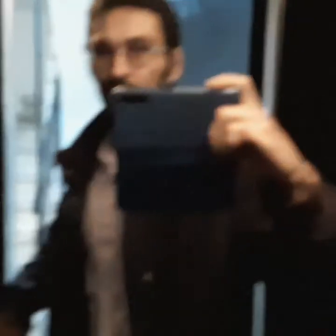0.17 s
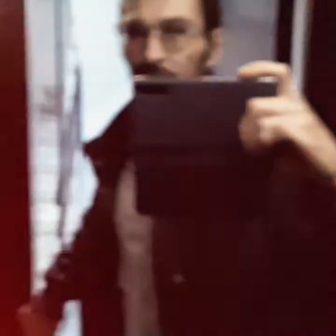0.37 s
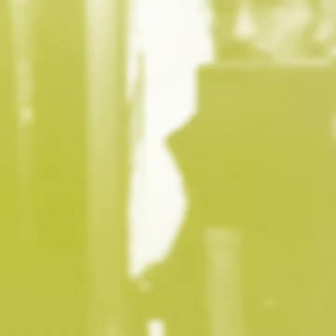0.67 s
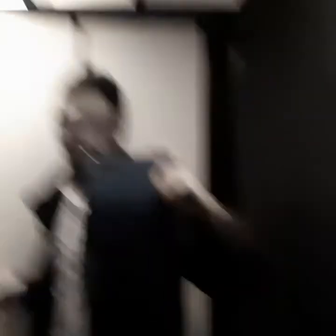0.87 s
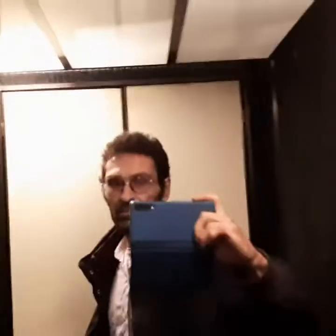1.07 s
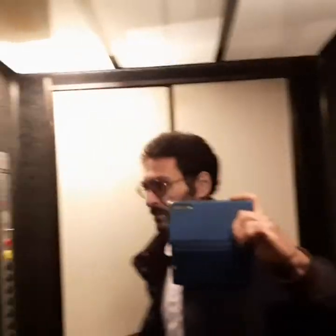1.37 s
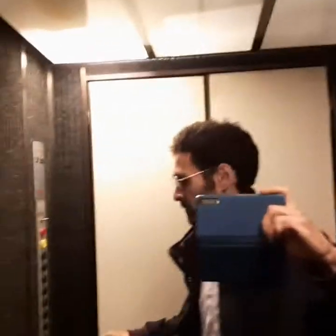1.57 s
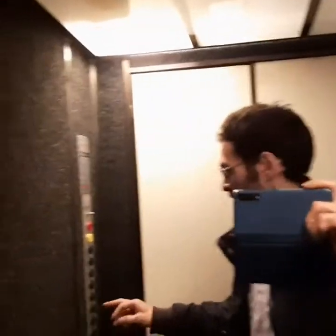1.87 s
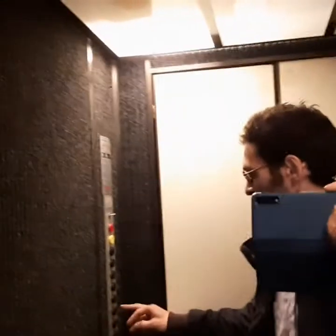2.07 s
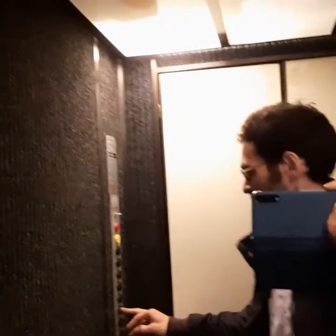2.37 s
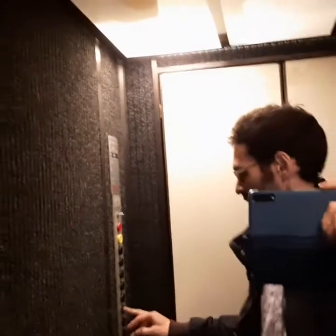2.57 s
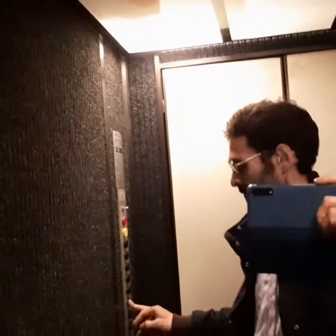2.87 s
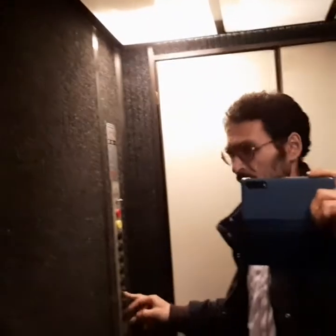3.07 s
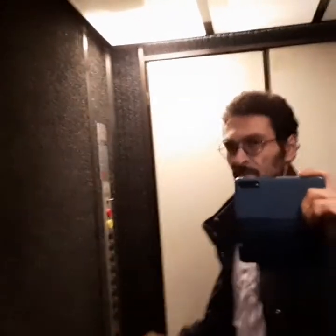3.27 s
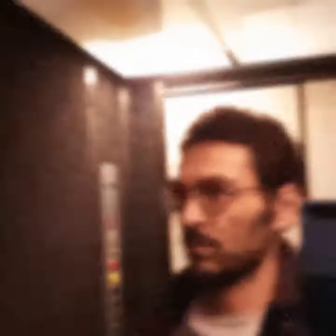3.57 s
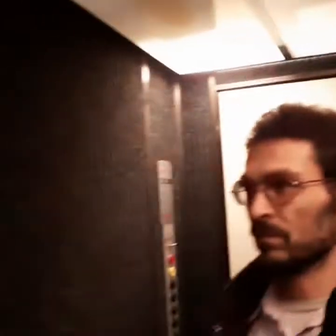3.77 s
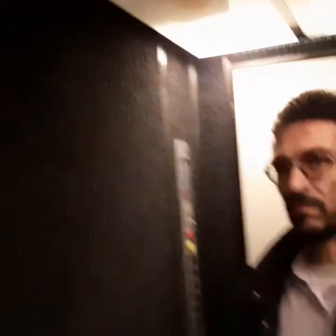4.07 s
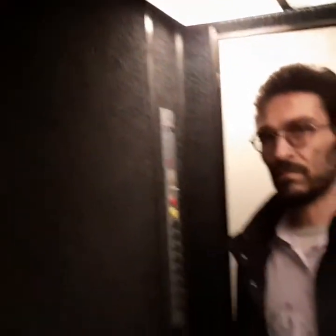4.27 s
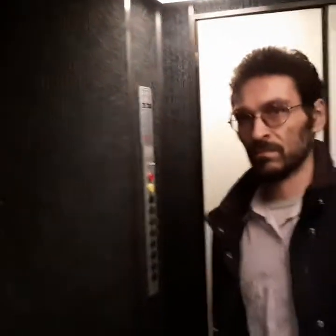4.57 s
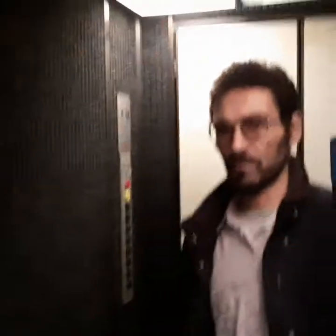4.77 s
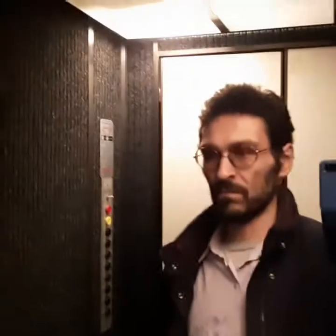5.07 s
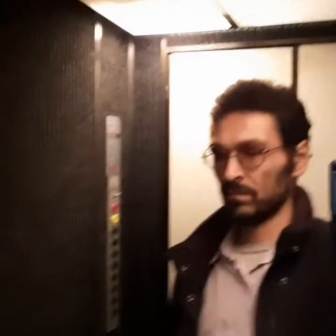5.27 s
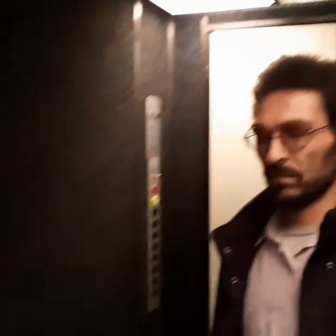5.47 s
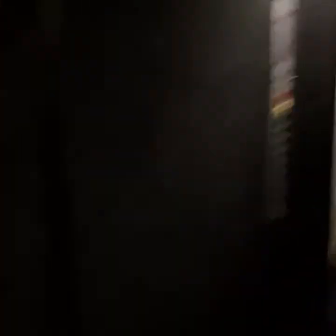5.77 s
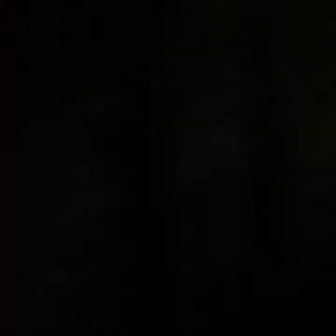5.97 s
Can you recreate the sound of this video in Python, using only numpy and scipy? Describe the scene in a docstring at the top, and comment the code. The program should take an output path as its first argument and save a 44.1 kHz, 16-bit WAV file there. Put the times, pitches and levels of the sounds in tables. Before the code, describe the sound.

Close to the microphone, a nylon sleeve swishes and gives a tiny zip over soft floor bumps. Lift doors crash shut, loud enough to distort, and rebound dully. Quiet cloth and ticks follow, then a button clunk, a clattering metal lock and a groaning motor start. The small car hums and rattles; a longer nylon zip, bumps and one hollow knock come before the hum eases off.

```python
"""A nylon sleeve swishes and zips close to the microphone, over soft bumps and the quiet air of a small lift car.
The doors slam into overload, a button is pressed, the lock clatters home and the motor starts to hum;
one more knock comes on the way. Cloth, air and rumble are coloured noise; blows are noise bursts and
decaying modes; a zip adds multiples of the rib rate to a rub; the hum is a set of wavering tones.
Two microphone ports hear it all, alike in the bass and less so in the treble."""
import sys
import numpy as np
from scipy import signal
from scipy.fft import rfft, irfft, next_fast_len
from scipy.io import wavfile

SR = 44100
rng = np.random.default_rng(int(sys.argv[2]) if len(sys.argv) > 2 else 0)


def inscribe(sig):
    """Save sig as 16-bit PCM at rate SR to the path in sys.argv[1].

    A 1-D sig is mono; a 2-D sig holds one channel per row.
    Samples are clipped to [-1, 1] before scaling.
    """
    pcm = np.round(np.clip(np.atleast_2d(sig).T, -1, 1) * 32767)
    wavfile.write(sys.argv[1], SR, pcm.astype(np.int16))


N = 270333
TIME = np.arange(N) / SR  # s

# how much louder the left port hears than the right: [f/Hz, level/dB]
BALANCE = [(60, -1.5), (300, -2.5), (700, -2), (1300, -1.5), (2400, -4.5), (4300, -4.5), (8000, -7.5),
           (14000, -8.5)]
# noise colour of a wall struck or shaken: [f/Hz, level/dB]
WALL_COLOUR = [(100, -24), (240, -3.5), (380, 1.5), (560, -1), (760, -6.5), (1400, -13.5), (2500, -15),
               (5000, -22.5), (15000, -53)]


def amp(db):
    """Decibels to gain."""
    return 10 ** (np.asarray(db) / 20)


def unit(x):
    """Scales to rms 1."""
    return x / np.sqrt(np.mean(x ** 2) + 1e-20)


def read(points, hz):
    """Reads a curve of (frequency, value) points on a log-frequency axis."""
    f, value = np.transpose(points)
    return np.interp(np.log(hz + 1), np.log(f), value)


def add(mix, s, sound):
    """Mixes a stereo sound in at s seconds."""
    part = mix[:, round(s * SR):][:, :sound.shape[1]]
    part += sound[:, :part.shape[1]]


def wander(rate_hz, size=N):
    """Slow chance: noise that falls away above rate_hz, at rms 1 before it is cut to size."""
    span = next_fast_len(max(size, SR))
    hz = np.fft.rfftfreq(span, 1 / SR)
    spectrum = rfft(rng.standard_normal(span)) / (1 + (hz / rate_hz) ** 4)
    return unit(irfft(spectrum, span))[:size]


def noise(colour, size=N):
    """Coloured noise at two microphone ports: alike in the bass, stronger on the right in the treble."""
    # likeness of the two ports: [f/Hz, correlation]
    likeness = [(60, 1), (300, 0.75), (630, 0.68), (1300, 0), (15000, 0.12)]
    hz = np.fft.rfftfreq(size, 1 / SR)
    a, b = np.exp(2j * np.pi * rng.random((2, len(hz))))
    same = np.clip(read(likeness, hz), -1, 1)
    lean_db = read(BALANCE, hz) / 2
    left = a * amp(lean_db)
    right = (same * a + np.sqrt(1 - same ** 2) * b) * amp(-lean_db)
    return unit(irfft(np.array([left, right]) * amp(colour(hz)), size))


def floor():
    """The quiet air of the car, a steady coloured noise."""
    # spectrum of the air: [f/Hz, level/dB]
    air_colour = [(12, -47), (20, -14.5), (92, 11.5), (189, -15.5), (1140, -17), (1310, -20.5),
                  (3090, -24.5), (4080, -15), (6910, -17.5), (9110, -29.5), (15000, -25)]
    return amp(-59.5) * noise(lambda hz: read(air_colour, hz))


def sleeve():
    """Grainy hiss of nylon that swells and fades with each move of the arm."""
    # moves of the arm: [t/s of the peak, level/dB, swell/s, fade/s]
    swishes = [(.16, -42.5, 0.31, 0.33), (.19, -41, 0.05, .03), (1.078, -47, 0.41, 0.43),
               (2.10, -61, 0.16, 0.32), (3.481, -40.5, 0.41, 0.17), (4.401, -44.5, 0.48, 0.47),
               (5.14, -58, 0.43, 0.083), (5.969, -51, 0.078, 0.18)]
    # spectrum of the cloth: [f/Hz, level/dB]
    cloth_colour = [(100, -4), (350, 7), (900, -6), (1500, -3.5), (2050, 1.5), (2700, -7.5), (3600, -2.5),
                    (4300, 3.5), (5700, -7), (7300, 3), (8600, -15), (11500, -11.5), (15000, -20.5)]
    drop_db, roundness = 11, 1.61  # drop over one swell or fade; 1 = pointed, 2 = bell
    power = 0
    for s, db, swell, fade in swishes:
        away = np.maximum((s - TIME) / swell, (TIME - s) / fade)
        power = power + amp(db - drop_db * away ** roundness) ** 2
    grain = amp(1.4 * wander(90))
    return noise(lambda hz: read(cloth_colour, hz)) * np.sqrt(power) * grain


def burst(colour, rise, t60):
    """A blow scattered by the close walls: dense ringing that swells and dies."""
    t = TIME[:SR]
    return noise(colour, size=SR) * (1 - np.exp(-t / rise)) * amp(-60 * t / t60)


def ring(modes, rise):
    """Modes after one blow; the higher ones reach the two ports further out of phase."""
    t, out = TIME[:SR], 0
    for hz, db, t60 in modes:
        lag = np.array([[0], [1]]) * rng.choice([-1, 1]) * hz / 700  # radians
        lean_db = read(BALANCE, hz) * np.array([[.5], [-.5]])
        wave = np.sin(2 * np.pi * (hz * t + rng.random()) + lag)
        out = out + amp(db + lean_db) * amp(-60 * t / t60) * wave
    return out * (1 - np.exp(-t / rise))


def panels(rise):
    """The walls' drumming modes, with the quicker-rising modes of the door skin."""
    # modes of the car's panels: [f/Hz, level/dB, t60/s]
    panel_modes = [(78.3, -25, 1), (115.5, -20.5, 0.7), (140.55, -5.5, .4), (202, -27.5, 0.59),
                   (280, 2.5, 0.18), (341, -31, 0.91), (411, -0.5, 0.18), (446.3, -1, 0.11),
                   (519, -12.5, 0.26), (617, -21, 0.16), (685, -7, 0.12), (779, -13, 0.2), (849, -9, 0.17),
                   (870, -7, 0.17), (1136, -11, 0.16)]
    # modes of the doors' sheet steel: [f/Hz, level/dB, t60/s]
    skin_modes = [(935, -22, 0.079), (1248, -15.5, 0.13), (1442, -17, 0.06), (1810, -21, 0.086),
                  (2330, -16, 0.13), (2557, -13, 0.14)]
    return ring(panel_modes, rise) + ring(skin_modes, rise / 2)


def thump(rise, t60):
    """The floor's dull answer to a blow."""
    # spectrum of the struck floor: [f/Hz, level/dB]
    floor_colour = [(25, -24), (45, -7), (70, 7.5), (130, 4.5), (220, -16), (400, -19), (1000, -65)]
    return burst(lambda hz: read(floor_colour, hz), rise, t60)


def clack(rise, t60):
    """A wall's answer: a woody clack and its panel modes."""
    return burst(lambda hz: read(WALL_COLOUR, hz), rise, t60) + amp(-10) * panels(rise)


def bumps():
    """Soft bumps of feet and car thump the floor and barely stir the walls."""
    # bumps on the car floor: [t/s, level/dB]
    bump_times = [(0.174, -41), (.230, -31), (0.31, -26), (.955, -33), (1.608, -41.5), (2.949, -35),
                  (3.737, -22), (3.848, -32.5), (4.416, -31.5), (4.816, -30.5), (5.442, -35.5),
                  (5.485, -31.5), (6.066, -31)]
    rise_s, t60_s, wall_db = 0.0054, 0.32, -20.5
    out = np.zeros((2, N))
    for s, db in bump_times:
        wall = amp(wall_db) * clack(rise_s / 2, t60_s)
        add(out, s, amp(db) * (thump(rise_s, t60_s) + wall))
    return out


def zips():
    """Nylon ribs sweep over each other: a growing rub, a whistle mostly at twice the rib rate, a short stop."""
    # quick strokes: [start t/s, end t/s, final rub level/dB, whistle level/dB,
    #                 early rib rate f/Hz, final rib rate f/Hz]
    strokes = [(0.198, 0.225, -42, -36, 920, 430), (3.299, 3.634, -30, -43.5, 700, 380),
               (6.001, 6.156, -35, -40.5, 710, 720)]
    # multiples of the rib rate in the whistle, the second strongest: [multiple, level/dB]
    rib_orders = [(1, -30), (2, -3.5), (3, -7), (4, -11), (5, -36), (6, -17.5)]
    # spectrum of the rubbed nylon: [f/Hz, level/dB]
    rub_colour = [(300, -10), (800, -8), (1400, -5), (2300, -3.5), (3200, -2.5), (7300, -5), (8800, -16.5),
                  (15000, -17.5)]
    swell_db_per_s, bend_s = 76, .022  # the rib rate bends in the last moments
    uneven, whistle_s = 0.031, 0.11  # rms flutter as a share of the rate; whistle's lead before the end
    out = np.zeros((2, N))
    for start, end, rub_db, whistle_db, rib_hz, end_hz in strokes:
        t = np.arange(0, end - start, 1 / SR)
        to_go = t[-1] - t
        steady_rate = rib_hz + (end_hz - rib_hz) * np.exp(-to_go / bend_s)
        rate = steady_rate * (1 + uneven * wander(303, size=len(t)))
        turns = np.cumsum(rate) / SR + rng.random((2, 1))
        ribs = sum(amp(order_db) * np.sin(2 * np.pi * k * turns) for k, order_db in rib_orders)
        whistle = amp(whistle_db) / (1 + (to_go / whistle_s) ** 8) * unit(ribs)
        hiss = noise(lambda hz: read(rub_colour, hz), size=SR)[:, :len(t)]
        rub = amp(rub_db - swell_db_per_s * to_go) * hiss
        edges = np.minimum(np.minimum(t, to_go) / 0.003, 1)  # 3 ms ramps
        add(out, start, edges * (rub + whistle))
    return out


def click(rise, t60):
    """The point of contact: a bright click and ringing steel."""
    # spectrum of the contact: [f/Hz, level/dB]
    contact_colour = [(500, -43), (1500, 1), (2900, 2), (4300, 6.5), (5600, 4.5), (7300, 1.5), (8500, -12),
                      (12000, -9), (15000, -18)]
    # modes of the steel of lock and button: [f/Hz, level/dB, t60/s]
    steel_modes = [(1630, -6, 0.07), (1906, 0.5, 0.1), (2300, -16, 0.13), (2680, 5.5, 0.028),
                   (3184, -1, 0.092), (3290, -28.5, 0.062), (4000, -7.5, 0.13), (4350, -9, 0.052),
                   (5390, 2, 0.045), (5430, -36, 0.17), (6020, -30.5, 0.07), (6740, -2, 0.097),
                   (7120, 11, 0.069), (9880, -19, 0.1), (11600, -13, 0.2)]
    return burst(lambda hz: read(contact_colour, hz), rise, t60) + amp(-17) * ring(steel_modes, rise / 2)


def ticks():
    """Loose metal clicks, with a little of the wall behind it."""
    # light ticks: [t/s, level/dB]
    tick_times = [(.288, -36), (0.47, -39.5), (1.216, -39.5), (1.642, -38.5), (2.453, -40.5), (2.854, -40),
                  (3.078, -14.5), (3.174, -24), (3.867, -35.5)]
    out = np.zeros((2, N))
    for s, db in tick_times:
        wall = amp(-8) * clack(rise=0.005, t60=0.11)
        add(out, s, amp(db) * (click(rise=.0006, t60=0.068) + wall))
    return out


def doors():
    """The door leaves meet in a bright crash, then rebound more dully; the slam pumps the panels."""
    # leaves meeting and rebounding: [t/s, level/dB, brightness above 500 Hz/(dB per octave)]
    slams = [(0.7975, -16.5, 8.5), (0.7997, 0.5, 4), (.809, -4, -5.5), (.822, -1, -1.5), (.835, -4, -7.5)]
    # spectrum of the slam before the brightness tilt: [f/Hz, level/dB]
    slam_colour = [(30, -18.5), (80, -19.5), (150, -9), (300, 2), (750, -2.5), (1200, -3), (2500, -9),
                   (3100, -18.5), (7200, -27.5), (8500, -36), (15000, -40)]
    # decay of the slam: [f/Hz, t60/s]
    slam_t60 = [(60, 0.89), (250, 0.12), (800, 0.11), (2000, 0.1), (6000, 0.14), (14000, 0.12)]
    out = np.zeros((2, N))
    for s, db, tilt_db in slams:
        def colour(hz):
            return read(slam_colour, hz) + tilt_db * np.log2(np.maximum(hz, 500) / 500)
        hz, t, bands = signal.stft(noise(colour, size=SR), SR, nperseg=256)
        decay = amp(-60 * t / read(slam_t60, hz)[:, None])  # each band dies at its own pace
        crash = signal.istft(bands * decay, SR, nperseg=256)[1][:, :SR]
        add(out, s, amp(db) * crash * (1 - np.exp(-TIME[:SR] / 0.0012)))
    add(out, .806, amp(2.5) * panels(rise=0.0066))
    return out


def blows():
    """A blow clacks in the wall with a chatter of metal; the floor's thump swells slower and rings longer."""
    # blows and scuffs of door, hand, button, lock and car:
    # [t/s, level/dB, metal click relative to it/dB, rise/s, t60/s]
    knocks = [(.88, -34.5, -9.5, 0.0057, 0.36), (.954, -36.5, -17, 0.0018, 0.6),
              (1.589, -56, 16.5, 0.0064, 0.36), (2.08, -52, -3.5, 0.032, 0.58),
              (2.850, -47.5, -12, 0.0054, 0.9), (2.323, -18, -6.5, 0.019, 0.19),
              (2.362, -32.5, 6, 0.0004, 0.086), (2.908, -12, -1, 0.018, 0.1),
              (2.963, -29, 1.5, 0.0016, 0.41), (3.039, -22.5, -5, 0.0048, 0.44),
              (3.079, -11.5, 2, 0.0057, .16), (4.385, -20.5, -35, 0.0021, 0.071)]
    out = np.zeros((2, N))
    for s, db, click_db, rise, t60 in knocks:
        body = clack(rise, t60) + amp(-15.5) * thump(rise * 2, t60 * 3)
        unsteady = amp(click_db + 0.5 * wander(160, size=SR))  # loose parts chatter
        chatter = unsteady * click(rise, t60 * 0.81)
        add(out, s, amp(db) * (body + chatter))
    return out


def resonance_db(hz, ring_hz, width_hz):
    """The spectrum of one resonance, top 0 dB."""
    return -20 * np.log10(1 + ((hz - ring_hz) / width_hz) ** 2)


def ping(ring_hz, width_hz, rise, t60):
    """A blow that rings around one pitch."""
    return burst(lambda hz: resonance_db(hz, ring_hz, width_hz), rise, t60)


def taps():
    """Hollow panels and steel catches ring at their own pitches; a narrower catch rings longer."""
    # hollow taps on panels: [t/s, level/dB, f/Hz, rise/s]
    hollow_taps = [(1.101, -48, 976, 0.0022), (2.10, -52.5, 850, 0.025), (2.446, -39, 535, .002),
                   (3.043, -18.5, 705, 0.0018), (3.10, -16, 185, .002), (3.099, -16, 285, 0.0079),
                   (3.644, -47.5, 770, 0.0017), (3.735, -32, 774, 0.0044), (4.385, -21, 370, .001),
                   (4.385, -18.5, 172, 0.0017), (4.511, -40.5, 1990, .001), (4.569, -42.5, 2140, .001),
                   (5.683, -42.5, 760, 0.0057)]
    # pings of the steel catches: [t/s, level/dB, f/Hz, width/Hz]
    catch_pings = [(2.452, -31, 3400, 500), (2.962, -15, 4390, 200), (3.038, -17, 4400, 200),
                   (3.175, -11, 3760, 710)]
    tap_q, tap_t60_s = 3.9, 0.24  # pitch over width; length of the ring
    catch_t60_s = 0.058  # at a width of 200 Hz
    out = np.zeros((2, N))
    for s, db, hz, rise in hollow_taps:
        add(out, s, amp(db) * ping(hz, hz / tap_q, rise, tap_t60_s))
    for s, db, hz, width_hz in catch_pings:
        add(out, s, amp(db) * ping(hz, width_hz, 0.00065, catch_t60_s * 200 / width_hz))
    return out


def tone(hz):
    """One line of the drive, wavering in level and pitch."""
    level = amp(4.4 * wander(3.9))
    return level * np.sin(2 * np.pi * np.cumsum(hz + 1.477 * wander(5.66)) / SR)


def motor():
    """The drive starts with a jolt that groans and shakes the walls, hums and rattles on, then eases off."""
    # lines of the drive: [f/Hz, level/dB]
    hum_lines = [(75, -0.5), (100, 0.5), (202, -11), (301, -20.5), (332, -12.5), (377, -17.5), (420, -16)]
    # spectrum of the rattling car: [f/Hz, level/dB]
    rumble_colour = [(20, -2), (45, -19.5), (85, -1.5), (150, 1.5), (240, -5.5), (410, -9.5), (520, -14.5),
                     (800, -36.5), (1500, -43), (5000, -42)]
    start_s, start_rise_s, run_up_s = 3.08, 0.04, 0.6
    ease_at_s, ease_db_per_s = 5.64, 19
    groan_hz, groan_width_hz, groan_db, groan_t60_s = 117.7, 21, -23, 1.43
    shudder_db, shudder_t60_s = -29.5, 0.99
    age = np.maximum(TIME - start_s, 0)
    ease = amp(-ease_db_per_s * np.maximum(TIME - ease_at_s, 0))
    running = np.minimum(age / start_rise_s, 1) * ease
    run_up = np.minimum(age / run_up_s, 1)
    groan = noise(lambda hz: resonance_db(hz, groan_hz, groan_width_hz))
    groan = groan * amp(groan_db - 60 * age / groan_t60_s)
    lines = unit(sum(amp(db) * tone(hz) for hz, db in hum_lines))
    hum = amp(-38) * run_up ** 2 * ease * lines * amp([[-3.5], [-2]])  # left, right dB
    rattle = amp(-45) * noise(lambda hz: read(rumble_colour, hz)) * amp(2.5 * wander(8))
    shudder = noise(lambda hz: read(WALL_COLOUR, hz)) * amp(shudder_db - 60 * age / shudder_t60_s)
    return hum + running * (groan + rattle + shudder)


def walls(x):
    """First echoes off the close walls comb the sound with one fixed ripple."""
    # echoes: [delay to the left port t/s, delay to the right port t/s, level/dB]
    echoes = [(.0015, 0.001, -19.5), (.0044, 0.0051, -13.5), (.0073, 0.0085, -10.5)]
    out = x.copy()
    for left, right, db in echoes:
        add(out, left, x * amp(db) * [[1], [0]])
        add(out, right, x * amp(db) * [[0], [1]])
    return out / np.sqrt(1 + sum(amp(db) ** 2 for left, right, db in echoes))


def scene():
    """Everything in the car, over its quiet air; the bass of the near sounds is too long for the walls to comb."""
    near = sleeve() + bumps() + zips() + ticks() + blows() + taps()
    bass = signal.sosfiltfilt(signal.butter(2, 450, fs=SR, output="sos"), near)
    return floor() + bass + walls(near - bass) + doors() + motor()


def record(dry):
    """The microphone overloads, flattening peaks against full scale; then a low-pass ends the band at 15350 Hz."""
    clipped = dry / (1 + dry ** 6) ** (1 / 6)
    lowpass = signal.firwin(255, 15350, window=("kaiser", 8), fs=SR)
    return signal.oaconvolve(clipped, lowpass[None], "same")


dry = scene()
out = record(dry)
inscribe(out)
```